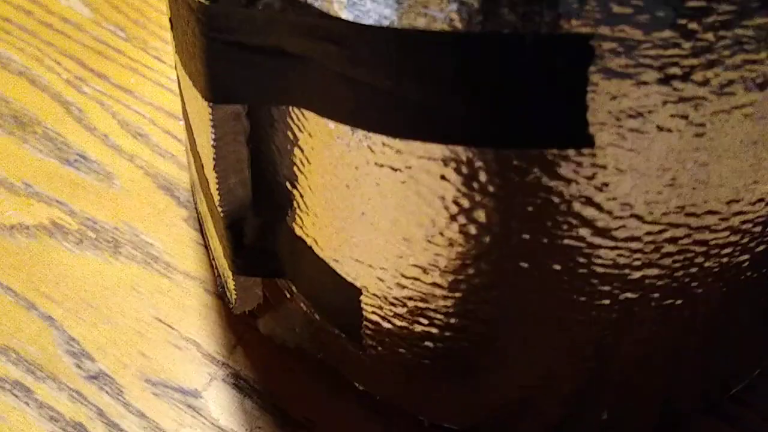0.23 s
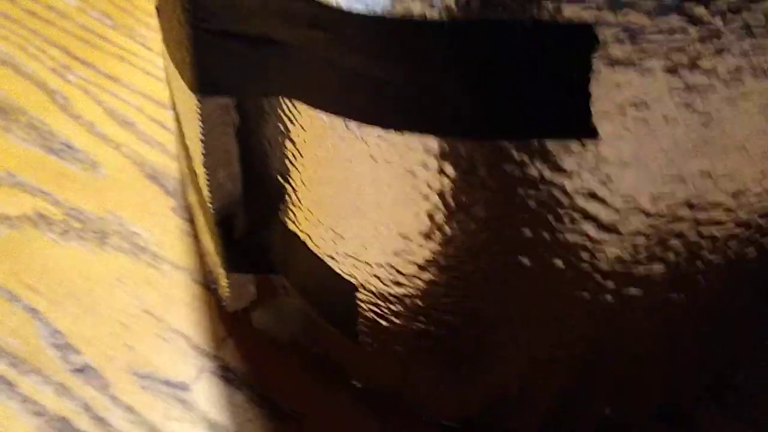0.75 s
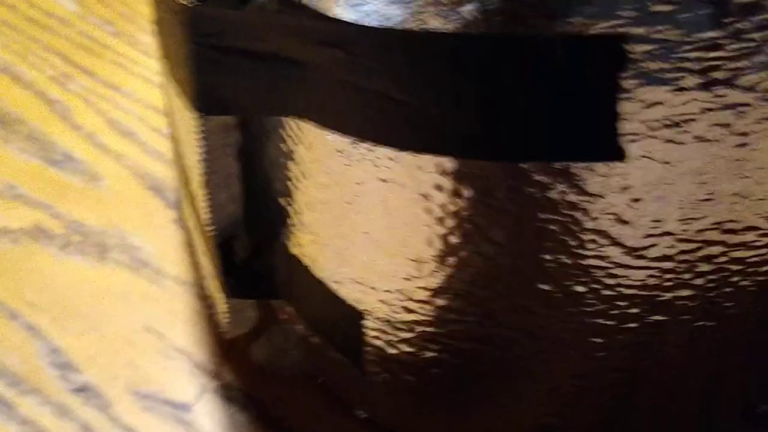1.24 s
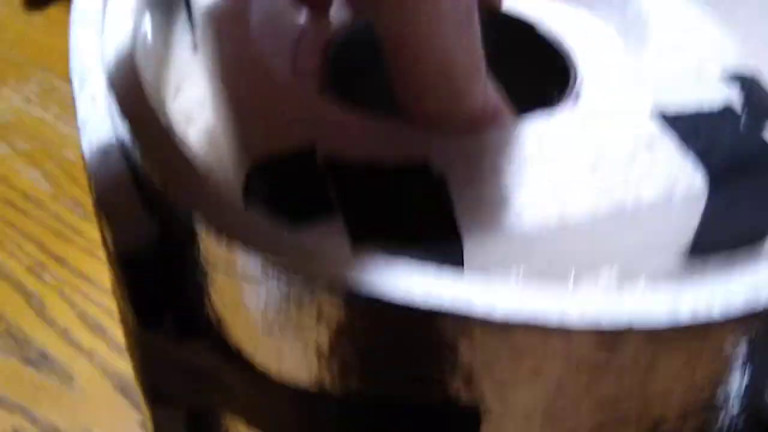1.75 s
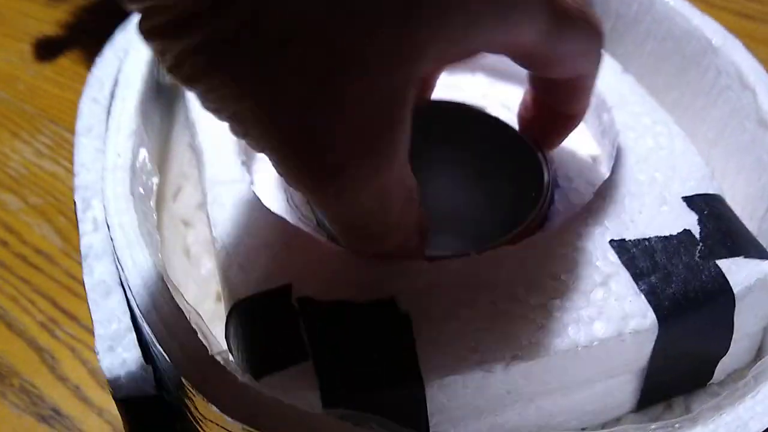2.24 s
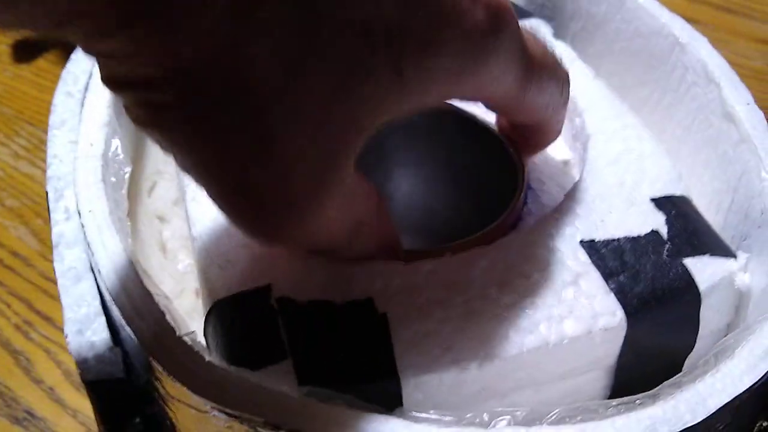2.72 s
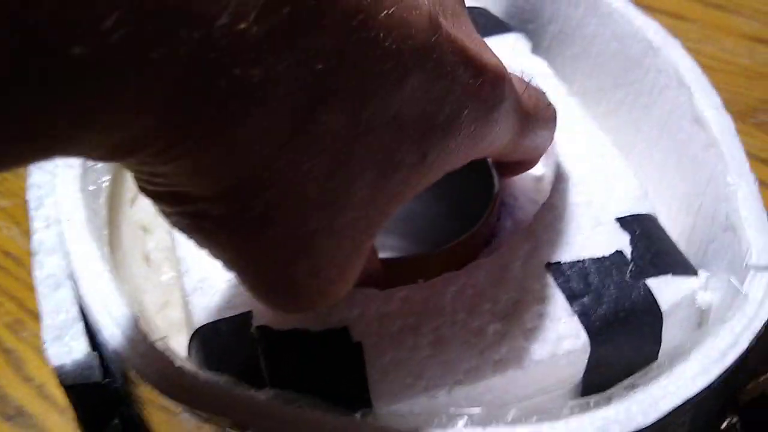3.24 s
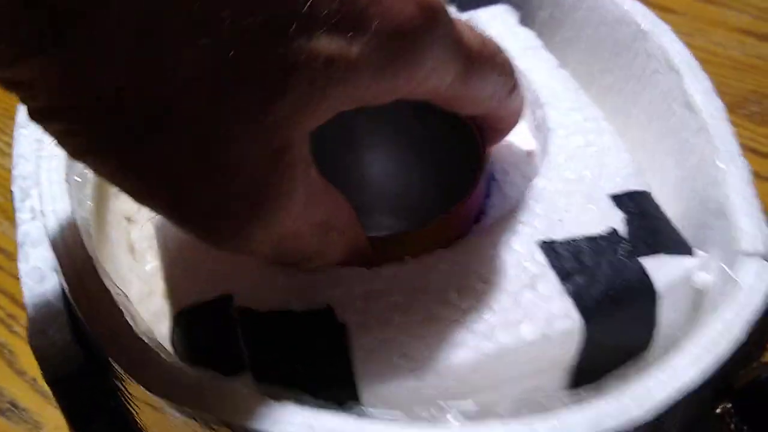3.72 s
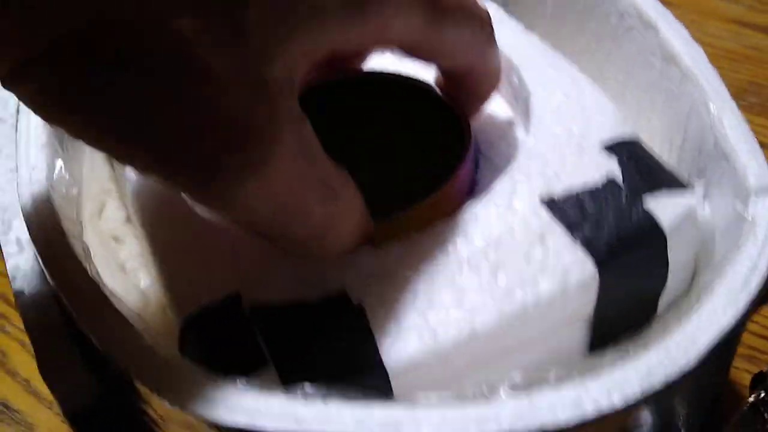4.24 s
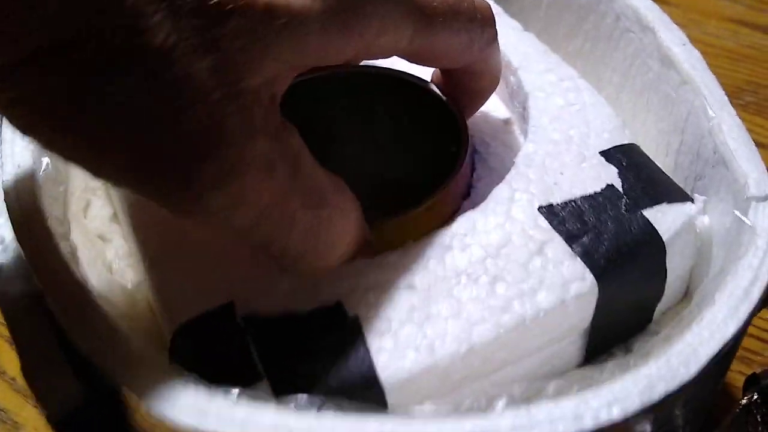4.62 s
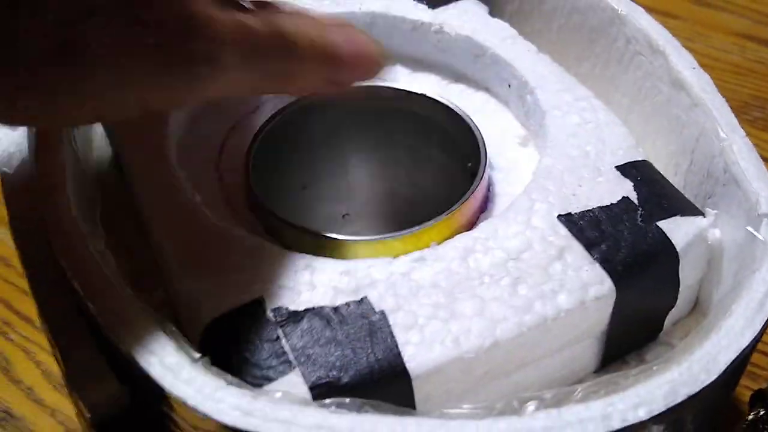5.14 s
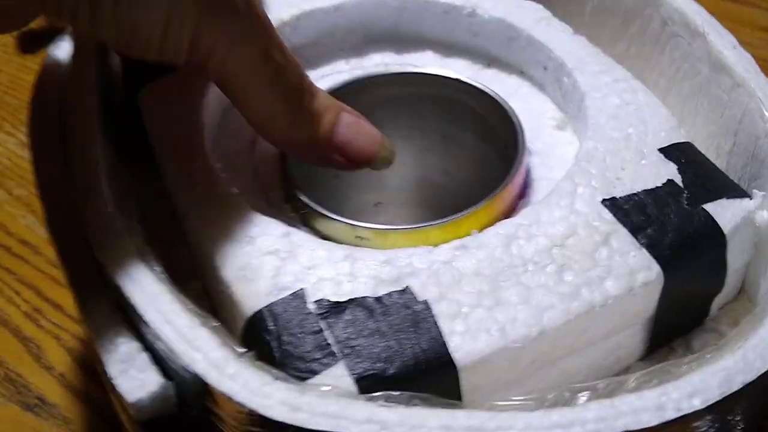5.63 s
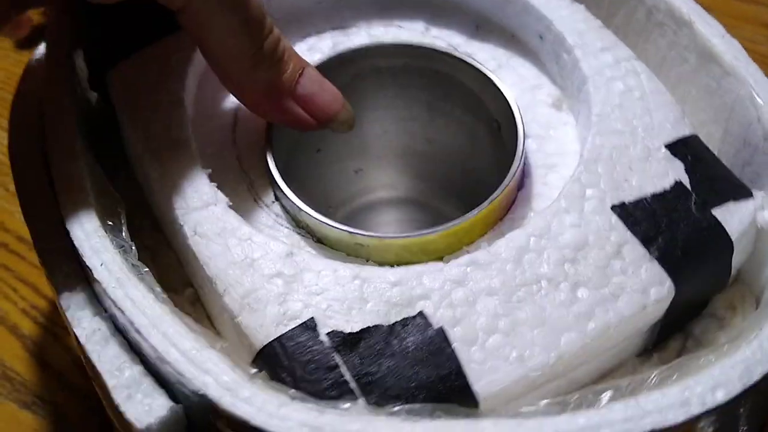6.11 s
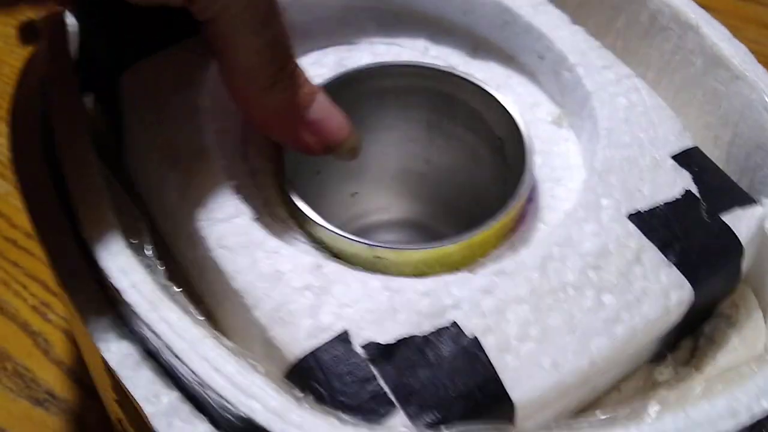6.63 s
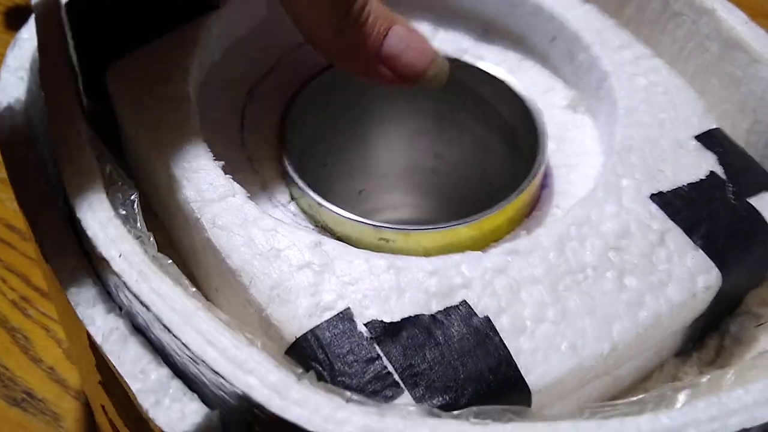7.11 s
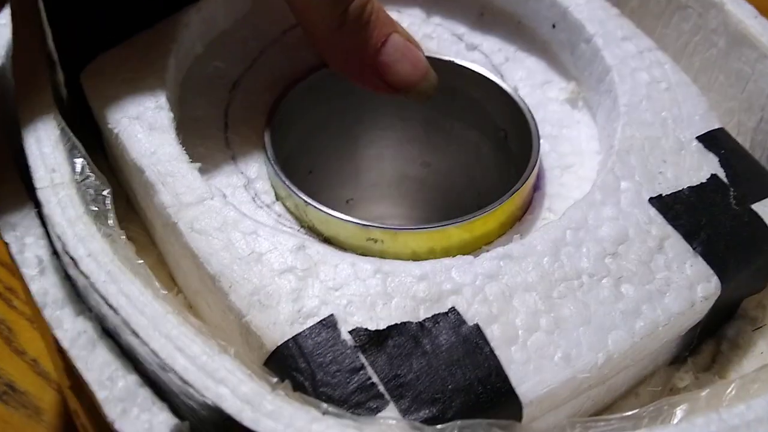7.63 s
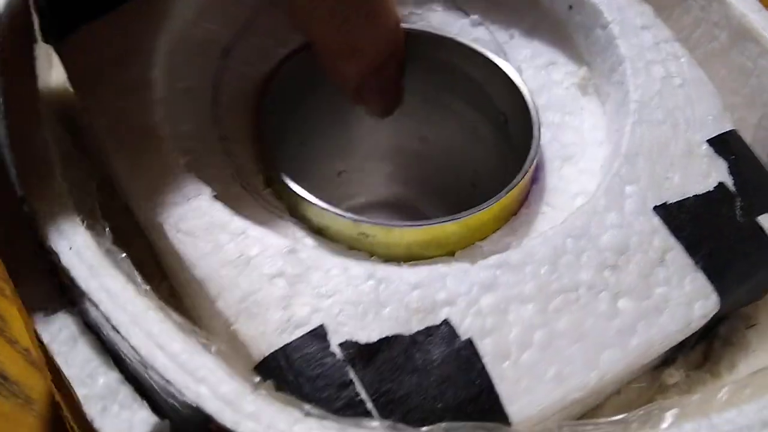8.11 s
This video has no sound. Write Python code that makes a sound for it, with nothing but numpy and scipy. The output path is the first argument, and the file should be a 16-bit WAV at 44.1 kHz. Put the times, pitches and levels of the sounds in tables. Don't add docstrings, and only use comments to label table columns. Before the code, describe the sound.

Close gritty rubbing of a hand on foam, film crackling and snapping, a brief stuttering creak midway, then busier finger strokes in a quiet room.

```python
import sys
import numpy as np
from scipy import signal
from scipy.fft import rfft, irfft, next_fast_len
from scipy.io import wavfile
from scipy.ndimage import uniform_filter1d, map_coordinates

SR = 44100
rng = np.random.default_rng(int(sys.argv[2]) if len(sys.argv) > 2 else 0)


def how_loud(loudness_db):
    steps = np.asarray(loudness_db, float) / 20
    return 10 ** steps


def transcribe(signal):
    frames = np.atleast_2d(signal).T
    limited = np.clip(frames, -1, 1)
    pcm = np.round(limited * 32767).astype(np.int16)
    wavfile.write(sys.argv[1], SR, pcm)


N = 368676
BIN_HZ = np.fft.rfftfreq(next_fast_len(N), 1 / SR)

# peak_s, level_db, rise_s, fall_s, film_hiss_db
HAND_STROKES = [(.001, -59.5, .01, 0.16, 6), (0.135, -44.5, 0.014, 0.07, -4),
                (0.214, -58.5, 0.033, 0.053, 4.5), (.328, -71.5, 0.034, 0.16, 5),
                (0.546, -64.5, 0.04, 0.14, 3.5), (0.672, -61, 0.054, 0.068, 2),
                (0.771, -54, 0.028, 0.09, 0), (0.962, -46, 0.12, 0.033, 3.5),
                (1.037, -52, 0.048, 0.047, 11), (1.152, -39, 0.087, 0.11, 6.5), (1.288, -59, 0.034, .12, 5),
                (1.372, -64, 0.043, 0.042, 3.5), (1.52, -50.5, 0.025, 0.048, 0),
                (1.735, -56, 0.15, 0.22, -6),
                (1.96, -49.5, 0.033, 0.082, -2.5), (2.032, -41.5, 0.04, 0.16, 3),
                (2.125, -46.5, 0.018, 0.08, -2.5), (2.2, -49, 0.069, 0.2, 1.5),
                (2.371, -58, 0.012, 0.095, -10), (2.615, -65, 0.14, 0.14, -12),
                (2.77, -51.5, 0.11, 0.04, -8), (2.829, -58, 0.082, 0.31, -8.5),
                (3.228, -73.5, 0.059, 0.18, -10), (3.45, -54, 0.11, 0.045, -23),
                (3.559, -63.5, 0.089, 0.14, -18), (3.743, -63, 0.066, 0.26, -6),
                (3.876, -57.5, 0.088, 0.069, -26), (3.997, -55, 0.059, 0.065, -16),
                (4.066, -47, 0.02, 0.11, -1), (4.168, -49.5, 0.0094, 0.061, -5),
                (4.3, -73.5, 0.1, 0.22, -15), (4.327, -56.5, 0.018, 0.032, -8), (4.751, -83, 0.13, 0.1, -7),
                (4.831, -55, 0.025, 0.034, -9),
                (4.994, -42, 0.086, 0.053, 3), (5.056, -37, 0.032, 0.027, -3.5),
               (5.159, -50, 0.12, 0.045, 2.5), (5.266, -37, 0.039, 0.055, -24),
               (5.357, -47.5, 0.081, 0.022, -20), (5.447, -45.5, 0.058, 0.18, -5),
               (5.57, -40, 0.032, 0.095, -1.5), (5.666, -48.5, 0.025, 0.023, -22),
               (5.71, -51.5, 0.027, 0.075, -13), (5.85, -52, 0.11, 0.15, -4),
               (6.048, -46, 0.021, 0.039, -11), (6.089, -41, .04, 0.097, -7.5),
               (6.399, -55.5, 0.22, 0.041, -19), (6.534, -40.5, 0.09, 0.098, -8.5),
               (6.691, -44.5, 0.035, 0.07, -12), (6.781, -35.5, 0.087, 0.11, -5.5),
               (7, -41.5, 0.12, 0.087, -4), (7.144, -38, 0.063, 0.082, -5), (7.309, -38, 0.081, 0.11, -13),
               (7.385, -45.5, 0.036, 0.043, -22), (7.436, -41.5, .04, 0.051, -9),
               (7.512, -39.5, 0.071, 0.059, 3.5), (7.641, -67, 0.083, 0.14, -6),
               (7.775, -52, 0.053, 0.062, -7), (7.83, -47, 0.068, 0.13, -12),
               (7.885, -63.5, 0.046, 0.028, -12), (7.955, -52, 0.051, 0.053, -7),
               (8.08, -47, 0.053, 0.074, -1.5), (8.219, -50.5, 0.1, 0.067, -13),
               (8.306, -58, 0.027, 0.066, -16)]
# time_s, level_db
HAND_WEIGHT = [(0, -3.5), (.2, -1.5), (.6, -2), (.96, 1.5), (1.16, -3.5), (1.4, 6.5), (1.55, 4), (1.75, 3),
               (2.0, -8.5), (2.502, -3), (3.4, -5.5), (4.001, -5), (4.8, -1), (5.05, -5.5), (5.8, 1.5),
               (6.1, -4), (6.7, -5), (8.1, -4.5)]
REST_DB, REST_FILM_DB = -79, -3
LINGER_S, LINGER_SHARE = .09, .12
SCRAPE_CURVE, FILM_CURVE = 1.73, 2.96
BODY_LAG = 0.15

# freq_hz, level_db
SCRAPE_COLOUR = [(1500, -20), (2000, -5), (2700, -1.5), (3350, 0.5), (3800, -4), (4600, -10), (5600, -15),
                 (7500, -26)]
# freq_hz, level_db
BODY_COLOUR = [(200, -20), (400, -4), (700, 0), (950, -3), (1330, -.5), (1750, -4), (2300, -10),
               (4000, -30)]
# freq_hz, level_db
RUMBLE_COLOUR = [(25, -34), (60, -8), (120, 3), (170, 2.5), (230, -1), (350, -4), (600, -17), (1200, -36)]
# freq_hz, level_db
FILM_COLOUR = [(3500, -22.5), (5500, -3.5), (7500, -6.5), (9500, 1), (11000, 0), (14000, 5), (15500, 0.5),
               (16500, -33.5)]

# start_s, end_s, pitch_hz, width_hz, level_db
SHELL_HUMS = [(2.11, 2.32, 705, 28, -53.5), (.185, .24, 1400, 350, -49.5), (2.742, 2.77, 830, 400, -50),
              (1.36, 1.41, 1420, 120, -57.5), (4.95, 5.18, 690, 140, -52), (5.04, 5.075, 1200, 250, -45.5),
              (4.94, 5.02, 1030, 550, -48), (1.12, 1.24, 1340, 170, -40.5), (.93, .975, 1360, 50, -42),
              (1.8, 1.85, 700, 250, -57.5), (6.68, 6.87, 2040, 760, -43), (7.3, 7.56, 2000, 910, -45.5)]
# start_s, end_s, first_rate_hz, last_rate_hz (slips per second), level_db
CREAKS = [
    (2.8, 2.82, 200, 170, -29),
    (2.8252, 2.888, 145, 190, -25.5),
    (2.897, 2.982, 190, 110, -28),
    (3.4095, 3.42, 150, 190, -26),
    (3.4215, 3.447, 250, 400, -22.5),
    (3.448, 3.466, 480, 380, -27),
    (1.13, 1.19, 170, 180, -29.5),
    (.935, .975, 720, 350, -31),
]
# start_s, level_db
LONE_SLIPS = [(2.9975, -30), (3.017, -33), (3.069, -37), (3.082, -36), (3.102, -31), (3.111, -38),
              (3.119, -31), (3.134, -35), (3.1465, -33), (3.161, -25), (3.1785, -34), (3.23, -29),
              (3.236, -31), (3.382, -37), (3.399, -22), (3.4755, -30)]
# start_s, end_s, first_rate_hz, last_rate_hz, level_db
GROANS = [
    (4.664, 4.679, 170, 180, -44),
    (4.681, 4.74, 260, 220, -42),
]

# start_s, level_db, body_db, film_hiss_db, t60_s
FOLDS = [
    (0.128, -8.5, -16.5, -9, 0.011),
    (0.1345, -16, -31, 1, 0.022),
    (1.1426, -20, -4.5, 6.5, 0.016),
    (2.1104, -12.5, -13.5, 5, 0.025),
    (2.1762, -9.5, -27, -6, 0.009),
    (2.7772, -3, -13.5, -11, 0.0083),
    (4.0578, -6, -22.5, -2.5, 0.0085),
    (7.3, -20, 4, -20.5, 0.0053),
    (7.3025, -12, -16, -13, 0.023),
]
# start_s, level_db, body_db, film_hiss_db
CRINKLES = [(0.0173, -33, -6, 9.5), (0.09, -46, -6, 9), (0.3185, -45, 0, 17.5), (0.3475, -44, -26, -11),
            (0.404, -42, -6, 11.5), (0.7637, -28, -8, -4), (0.7953, -31.5, -28, 10.5),
            (1.1569, -16.5, -10, -2), (1.1701, -40, -13, -1), (1.476, -48, -8, 8),
            (1.5045, -39, 20.5, 17.5), (2.138, -20, -10, -7), (2.2579, -27.5, -9, 8),
            (2.2912, -24.5, -11, 1), (2.3703, -27.5, -9.5, -6), (2.5573, -25, -11.5, 1.5),
            (2.611, -25.5, -11, 2), (3.0304, -41, -13, -5), (3.217, -36.5, -11.5, 2),
            (3.7423, -30, -4.5, 6.5), (4.1629, -26, -1, -3.5), (4.6845, -43, -7, 3.5),
            (4.8342, -45.5, -3, 1), (4.9133, -44, -13, 0), (4.8987, -37, -9, -2), (5.641, -29.5, -27, -3),
            (6.0762, -24, -9, 3), (7.634, -25, -14.5, -0.5), (7.933, -24, -9.5, -7),
            (8.2103, -27.5, -5.5, 11.5)]
# start_s, level_db, body_db, t60_s
BEAD_CRACKS = [(0.6988, -29.5, -11, 0.013), (0.9202, -32.5, 5, 0.0087), (1.0319, -26, -18, 0.029),
               (1.4291, -35, -4, .008), (1.4353, -31, -5, 0.012), (1.952, -38.5, -3.5, .024),
               (2.8931, -26.5, -27, 0.012), (5.0495, -27, -18, 0.023), (5.2378, -35, -4, 0.029),
               (5.557, -41, -11, .017), (5.5617, -17.5, -27, 0.019), (5.7101, -28.5, -10.5, 0.038),
               (6.0406, -31, -10, 0.016), (6.6797, -28, -18, 0.012), (6.754, -23, -15, 0.019),
               (7.4263, -22, -18, 0.074), (7.824, -23, -13, 0.012), (7.848, -34, -17, 0.0087),
               (7.785, -29, -4, 0.008), (8.084, -30, -17, .012), (5.165, -28.5, -22, 0.012),
               (5.186, -39, -11, .01), (5.582, -15, -18, 0.0089), (6.09, -24, -5, .014),
               (7.91, -22.5, -27, 0.021), (7.9562, -26, -6.5, 0.02), (8.236, -21, -29, 0.0051),
               (2.0188, -27, -37, .015), (4.0955, -33, -4, .012), (7.1092, -36, -15, .015),
               (7.3831, -31, -19, 0.022), (7.4784, -33, -10, 0.013), (8.0486, -39, -2.5, 0.017),
               (8.1978, -40, -16, 0.0066), (7.329, -29, -18, 0.0094), (2.797, -33, -14.5, .012),
               (2.748, -32, -3, .012), (.205, -37, 0, .01), (4.276, -38, -1.5, 0.014)]
CRINKLE_T60_S, CRACK_FILM_DB = 0.019, -16
STEP_SPREAD_S = .0003

# start_s, level_db, pitch_hz, t60_s
SHELL_THUDS = [(0.939, -31, 162, 0.064), (1.169, -42, 103, 0.057), (1.505, -37, 205, 0.03),
               (1.523, -18.5, 250, 0.0096), (1.745, -41.5, 207, 0.054), (2.189, -51, 129, 0.093),
               (2.662, -32, 168, 0.084), (3.223, -48, 146, 0.1), (4.161, -22.5, 222, 0.022),
               (4.172, -32.5, 346, 0.066), (5.153, -48.5, 226, 0.11), (5.36, -38, 254, 0.046),
               (6.076, -30, 184, 0.03), (7.172, -37.5, 237, 0.05), (7.299, -26, 231, 0.04),
               (8.224, -44.5, 103, 0.08)]
# start_s, level_db, pitch_hz, t60_s
RIM_KNOCKS = [(0.126, -33, 1300, 0.048), (0.941, -25, 593, 0.039), (1.031, -32, 1104, 0.024),
              (1.504, -33, 530, 0.051), (2.778, -17, 1190, 0.006), (4.323, -38.5, 587, 0.025),
              (6.074, -22, 910, 0.017), (7.248, -10, 1270, 0.0064), (2.661, -35.5, 526, .03),
              (4.162, -31.5, 620, 0.013), (6.606, -40, 1100, 0.016), (7.3, -24, 1140, 0.013),
              (.017, -32, 1400, 0.016)]

# freq_hz, level_db
ROOM_COLOUR = [(25, -5.5), (60, 32), (260, -12.5), (500, 2.5), (3300, 8), (5000, -18), (8000, -20),
               (14000, -11.5)]
ROOM_DB = -77
# pitch_hz, level_db
FAN_TONES = [(237, -81), (700, -82.5)]

# freq_hz, level_db
PORT_BALANCE = [(60, -5), (110, 3.5), (380, 0), (700, -1), (2380, 0.5), (4400, -1), (8120, 4), (15000, -3)]
# freq_hz, share (0 to 1)
PORT_ALIKE = [(40, .75), (170, .1), (500, .45), (1100, .75), (2300, .72), (8800, .5), (10500, .12),
              (15000, .12)]
# freq_hz, turn_rad (added to the lag)
CASE_TURN_RAD = [(45, 6.2), (130, 5.2), (180, 4.5), (230, 3.3), (300, 3), (400, 2.3), (640, 1.6), (1100, 0)]
# freq_hz, gap_db
STEREO_GAP = [(500, 11), (2200, 6.5), (4500, 5.5), (7000, 5), (9000, 4), (15000, 7)]
PORT_LAG_S, LAG_SWAY_S = .000449, .000005
ATTACK_DB = 7
STEADY_TOP_HZ, SNAP_TOP_HZ = 15600, 16400


def strokes():
    scrape_db = pressure(SCRAPE_CURVE)
    film_db = pressure(FILM_CURVE, film=0.96)
    weight_db = np.interp(np.arange(N) / SR, *np.transpose(HAND_WEIGHT))
    body_db = scrape_db + weight_db - BODY_LAG * (scrape_db + 50)
    rumble_db = body_db - 8.5 - 0.46 * (body_db + 58)
    tick_db = 9.5 + np.minimum(2.0 * rng.exponential(size=N), 9) - 0.45 * (scrape_db + 73.5)
    ticks = (rng.random(N) < 130 / SR) * how_loud(tick_db)
    ticks = signal.lfilter([1], [1, -.93], ticks)
    flutter_db = 1.4 * walk(45) + 2.1 * walk(260)

    def layer(shape, level_db, trim_db, grit_db, tick_gain):
        swing = how_loud(level_db + trim_db + flutter_db + 1.2 * walk(25))
        return colour(jerks(grit_db) * swing * (1 + tick_gain * ticks), shape)

    rub = layer(SCRAPE_COLOUR, scrape_db, trim_db=-1.02, grit_db=1.6, tick_gain=0.2)
    rub = rub + layer(BODY_COLOUR, body_db, trim_db=-2.0, grit_db=1.6, tick_gain=0.24)
    rub = rub + layer(RUMBLE_COLOUR, rumble_db, trim_db=-2.5, grit_db=0.54, tick_gain=0.046)
    rub = rub + layer(FILM_COLOUR, film_db, trim_db=-5.0, grit_db=3.57, tick_gain=0.62)
    return wander(rub, spread_db=3, octaves=.25, hold_s=.05)


def pressure(curve, film=0):
    t = np.arange(N) / SR
    root = np.full(N, how_loud((REST_DB + film * REST_FILM_DB) / curve))
    for s, db, rise_s, fall_s, film_db in HAND_STROKES:
        span = slice(max(int((s - rise_s) * SR), 0), int((s + fall_s) * SR))
        ramp = np.interp(t[span], (s - rise_s, s, s + fall_s), (0, 1, 0))
        root[span] += how_loud((db + film * film_db) / curve) * ramp
    keep = np.exp(-1 / (LINGER_S * SR))
    root = root + LINGER_SHARE * signal.lfilter([1 - keep], [1, -keep], root)
    return 20 * curve * np.log10(root)


def jerks(spread_db):
    size = how_loud(spread_db * np.minimum(rng.exponential(size=N), 7))
    x = rng.standard_normal((2, N)) * size
    return x / np.sqrt(np.mean(x ** 2))


def wander(x, spread_db, octaves, hold_s):
    hz, s, frames = signal.stft(x, SR, nperseg=512)
    place = np.meshgrid(np.log2(1 + hz / 300) / octaves, s / hold_s, indexing="ij")
    patches = map_coordinates(rng.standard_normal((60, 400)), place, order=1, mode="wrap")
    return signal.istft(frames * how_loud(spread_db * patches), nperseg=512)[1][:, :N]


def hums():
    out = np.zeros((2, N))
    for start, end, hz, width_hz, db in SHELL_HUMS:
        span = slice(int(start * SR), int(end * SR))
        noise = rng.standard_normal((2, SR // 2))[:, :span.stop - span.start]
        ring = signal.lfilter(*signal.iirpeak(hz, hz / width_hz, fs=SR), noise)
        fade = signal.windows.tukey(ring.shape[1], .6)
        out[:, span] += ring / ring.std() * how_loud(db) * fade
    return out


def creaks():
    slips = slip_train(CREAKS)
    for s, db in LONE_SLIPS:
        slips[:, int(s * SR)] = how_loud(db)
    grit = rng.standard_normal((2, N)) * signal.lfilter([1], [1, -.97], slips)
    slips = slips + 0.07 * grit
    groan = signal.lfilter(*signal.iirpeak(1050, 1.6, fs=SR), slip_train(GROANS)) * how_loud(14)
    beads = colour(slips, SCRAPE_COLOUR)
    shell = how_loud(-11) * colour(slips, BODY_COLOUR)
    film = how_loud(-17) * colour(slips, FILM_COLOUR)
    return beads + shell + film + groan


def slip_train(table):
    slips = np.zeros((2, N))
    for start, end, rate, last_rate, db in table:
        s = start
        for late, size in rng.standard_normal((60, 2)):
            if s < end:
                slips[:, int(s * SR)] = how_loud(db + 1.8 * size)
            s += np.exp(0.09 * late) / np.interp(s, (start, end), (rate, last_rate))
    return slips


def snaps():
    events = FOLDS + [(*row, CRINKLE_T60_S) for row in CRINKLES]
    events = events + [(s, db, body_db, CRACK_FILM_DB, t60) for s, db, body_db, t60 in BEAD_CRACKS]
    start, level_db, body_db, film_db, t60 = np.transpose(events)
    start = start + .0007
    second_start = start + STEP_SPREAD_S * rng.random(len(events))
    t60 = np.clip(t60, .004, .2)

    def layer(shape, peak_db, stretch):
        step, tail = np.zeros((2, N)), np.zeros(N)
        for s, late_s, db, decay_s in zip(start, second_start, peak_db, t60):
            step[[0, 1], [int(s * SR), int(late_s * SR)]] = how_loud(db + 7.5)
            add(tail, s - .0002, db - 5.5, decay_s * stretch, .0002)
            add(tail, s, db - 26.0, decay_s * 5.3, .002)
        return colour(step + rng.standard_normal((2, N)) * tail, shape)

    beads = layer(SCRAPE_COLOUR, level_db - 3.5, stretch=1.1)
    shell = layer(BODY_COLOUR, level_db + body_db - 2.5, stretch=1.5)
    film = layer(FILM_COLOUR, level_db + film_db - 3.6, stretch=.7)
    return beads + shell + film


def thuds():
    out = np.zeros((2, N))
    blows = SHELL_THUDS + RIM_KNOCKS
    for (s, db, hz, t60), turn in zip(blows, rng.random((len(blows), 4))):
        shape = np.zeros(N)
        add(shape, s + .35 / hz, db - 1.5, np.clip(t60, .01, .3), .0008)
        i = np.flatnonzero(shape)
        t = (i - i[0]) / SR
        swing = 2 * np.pi * hz * t * np.exp(-2.5 * t)
        near = 0.51 * np.sin((1.118 + 0.47 * turn[0]) * swing + 2 * np.pi * turn[1]) * min(600 / hz, 1)
        upper = np.sin((2.0 + 1.4 * turn[2]) * swing) * np.exp(-t / 0.0038) * min(300 / hz, 1) ** 2
        lower = 0.25 * np.sin(0.59 * swing) * min(600 / hz, 1)
        main = np.sin(swing + np.array([[0], [2 * turn[3]]]))
        out[:, i] += shape[i] * (main + near + upper + lower)
    return out


def room():
    swell_db = 0.66 * walk(5.4)
    tones = np.zeros(N)
    for hz, db in FAN_TONES:
        level = how_loud(db + 2.0 * walk(2.5))
        phase = 2 * np.pi * np.cumsum(hz * (1 + 0.0074 * walk(6))) / SR
        tones += level * np.sin(phase)
    air = rng.standard_normal((2, N)) * how_loud(ROOM_DB + swell_db)
    return colour(air, ROOM_COLOUR) + tones


def on_hz(table, grid=BIN_HZ):
    hz, value = np.transpose(table)
    return np.interp(np.log(grid + 1), np.log(hz), value)


def colour(x, table, size=4096):
    cep = irfft(np.log(how_loud(on_hz(table, np.fft.rfftfreq(size, 1 / SR)))))
    cep[1:size // 2] *= 2
    cep[size // 2 + 1:] = 0
    response = irfft(np.exp(rfft(cep)))[:size // 2]
    response = response / np.sqrt(np.sum(response ** 2))
    return signal.oaconvolve(x, response[None], axes=1)[:, :N]


def walk(rate):
    k = int(SR / rate)
    held = np.repeat(rng.standard_normal(N // k + 1), k)
    return 1.35 * uniform_filter1d(held, k)[:N]


def add(track, s, db, t60, rise_s):
    i = int(s * SR)
    t = np.arange(min(N - i, int(1.5 * t60 * SR))) / SR
    track[i:i + len(t)] += how_loud(db - 60 * t / t60) * (1 - np.exp(-t / rise_s))


def low_pass(x, hz, depth_db):
    return signal.sosfilt(signal.ellip(8, .3, depth_db, hz, fs=SR, output="sos"), x)


def scene():
    steady = low_pass(strokes() + creaks() + hums() + room(), STEADY_TOP_HZ, 40)
    return steady + low_pass(snaps(), SNAP_TOP_HZ, 43) + thuds()


def stronger_of_sum_and_difference(left, right):
    pair = signal.stft(np.array([left + right, left - right]) / 2, nperseg=1024)[2]
    band = (9 * np.log2(1 + np.arange(pair.shape[1]) / 40)).astype(int)
    edge = np.flatnonzero(np.diff(band, prepend=-1))
    power = np.add.reduceat(abs(pair) ** 2, edge, axis=1)
    total = power.sum(axis=(0, 1))
    attack = total > how_loud(2 * ATTACK_DB) * np.roll(total, 2)
    power = uniform_filter1d(power, size=3, axis=2)
    gap = how_loud(-2 * on_hz(STEREO_GAP, edge * SR / 1024))[:, None]
    keep = (power > power[::-1] * gap) | attack
    mid, side = signal.istft(pair * keep[:, band], nperseg=1024)[1][:, :N]
    return np.array([mid + side, mid - side])


def top_cut(x):
    return signal.sosfilt(signal.butter(12, 16800, fs=SR, output="sos"), x)


def record(dry):
    near, other = rfft(dry, next_fast_len(N))
    alike = np.clip(on_hz(PORT_ALIKE), 0, 1)
    turn = np.exp(1j * (2 * np.pi * BIN_HZ * PORT_LAG_S - np.pi + on_hz(CASE_TURN_RAD)))
    lean = how_loud(on_hz(PORT_BALANCE) / 2)
    right = (np.sqrt(alike) * near + np.sqrt(1 - alike) * other) * turn
    left, right = irfft(np.array([near * lean, right / lean]), next_fast_len(N))[:, :N]
    swayed = np.arange(N) + LAG_SWAY_S * SR * walk(4)
    right = map_coordinates(right, [swayed], order=5, mode="nearest")
    ports = stronger_of_sum_and_difference(left, right)
    ports = signal.sosfilt(signal.butter(4, 60, "high", fs=SR, output="sos"), ports)
    return top_cut(ports)


dry = scene()
out = record(dry)
transcribe(out)
```